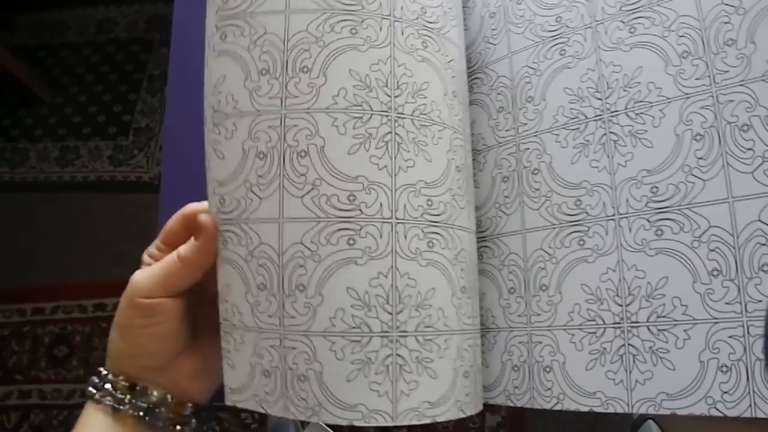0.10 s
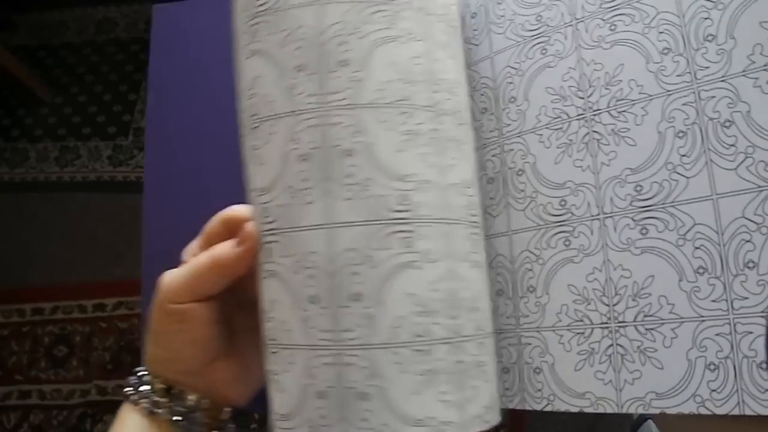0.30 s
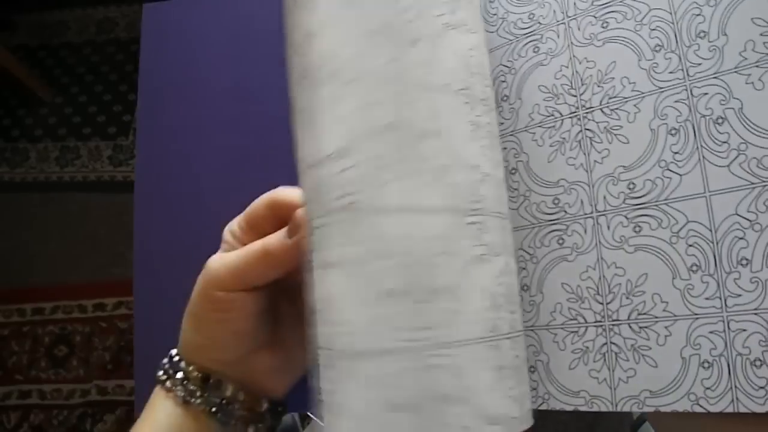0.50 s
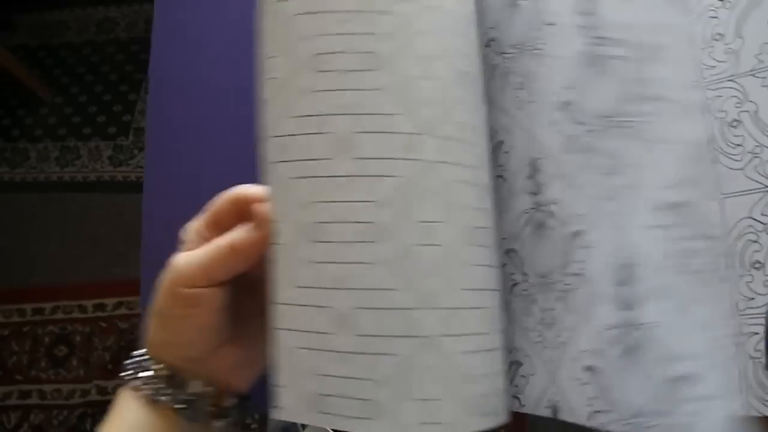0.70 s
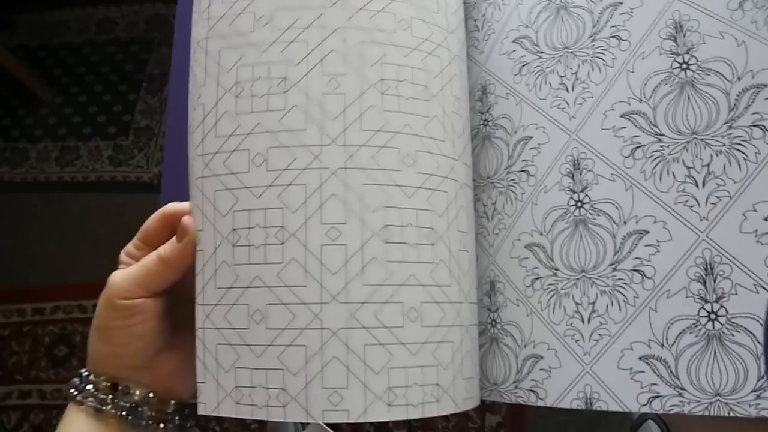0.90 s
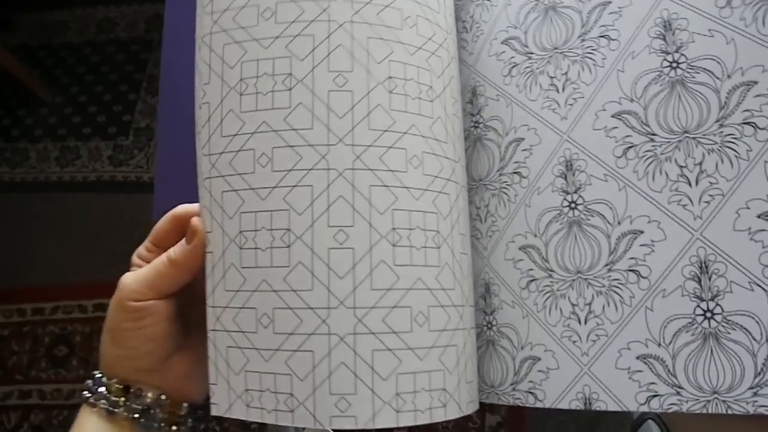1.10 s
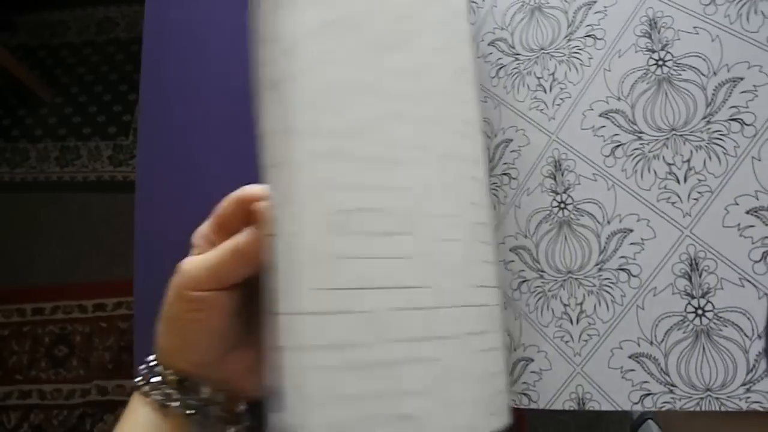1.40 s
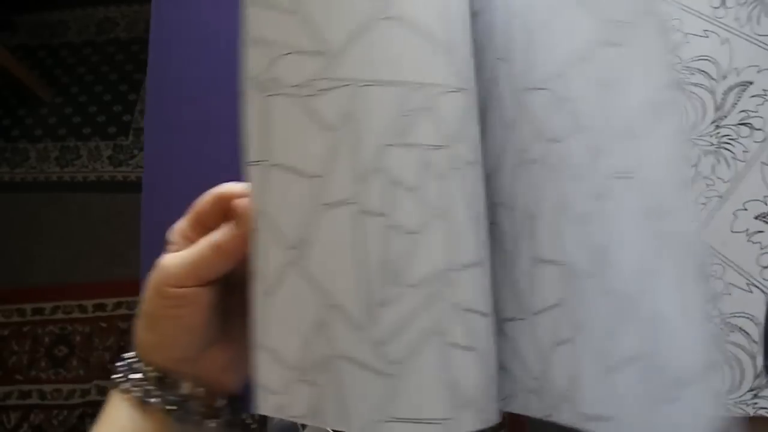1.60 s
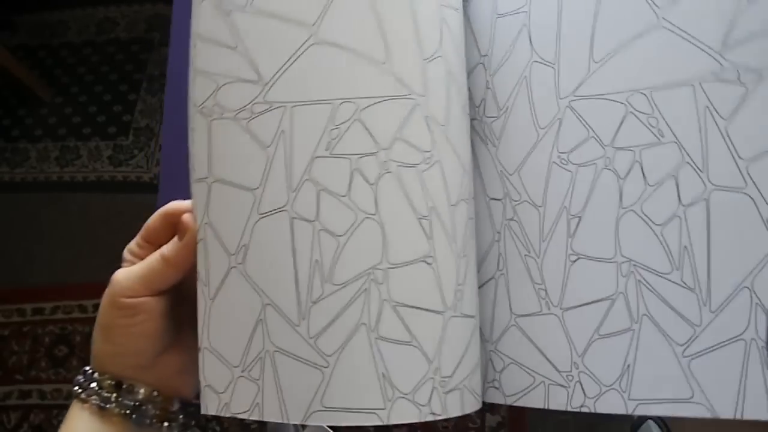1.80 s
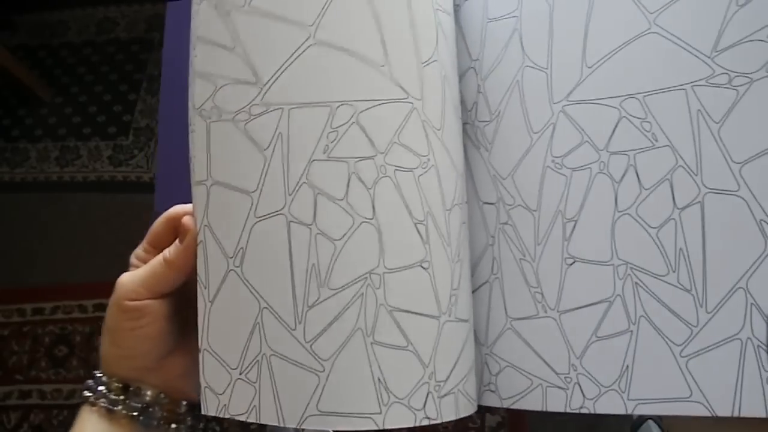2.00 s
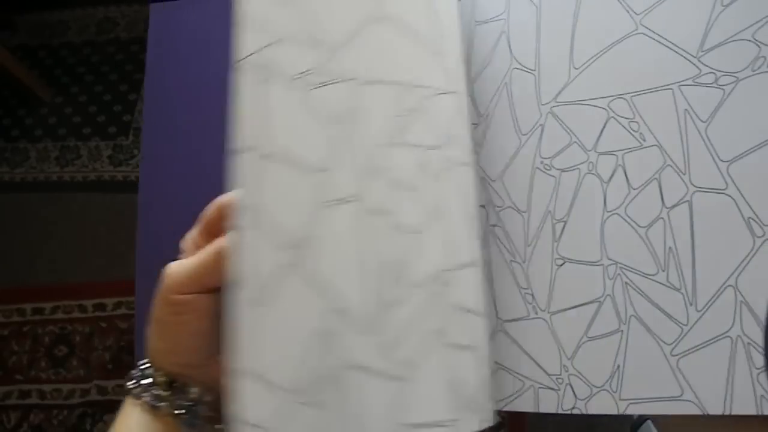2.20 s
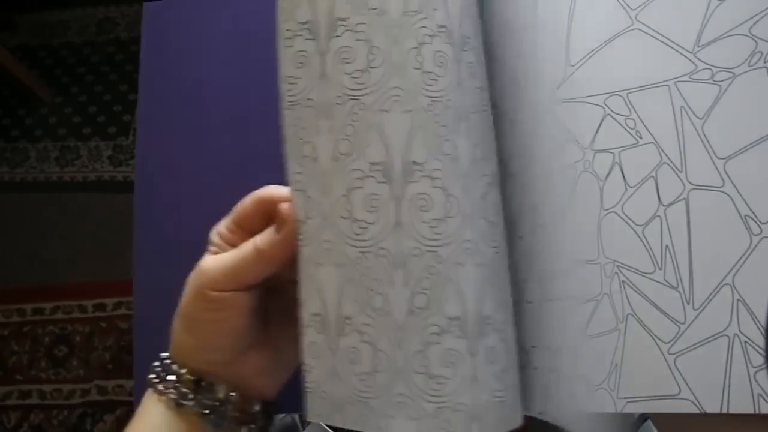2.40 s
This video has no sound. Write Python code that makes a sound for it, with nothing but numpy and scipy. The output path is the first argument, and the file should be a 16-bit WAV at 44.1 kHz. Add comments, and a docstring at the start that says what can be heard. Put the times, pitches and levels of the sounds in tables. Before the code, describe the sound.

Stiff paper sheets slide, tick against a finger and buckle with sharp snaps in three separate turns, the first strongest. Close stereo microphone, small quiet indoor space, short reflections, steady hiss and thin high whine beneath.

```python
"""Three thick pages turned by hand

Close to the microphone in a quiet room, sheets slide and buckle in runs of snaps.
A snap crosses the sheet as a bending wave, treble first, and rings its resonances briefly.
Shaped noise makes the sliding, edge ticks, crackle and puffs of air; echoes follow the snaps.
Under it lie room hiss, thin sine whistles and a faint, pulsing electrical whine."""
import sys
import numpy as np
from scipy import signal
from scipy.fft import rfft, irfft
from scipy.io import wavfile
from scipy.ndimage import uniform_filter1d

SR = 44100
rng = np.random.default_rng(int(sys.argv[2]) if len(sys.argv) > 2 else 0)


def digitize_waveform(pressure):
    """Quantize a signal to 16-bit integers and store it at the path in sys.argv[1].

    Rows of a 2-D input are taken as channels; values are limited to [-1, 1].
    """
    field = np.atleast_2d(pressure).T
    bounded = np.clip(field, -1, 1)
    quanta = np.round(bounded * 32767).astype(np.int16)
    wavfile.write(sys.argv[1], SR, quanta)


N = 114660
T = np.arange(N) / SR   # seconds
HZ = np.maximum(np.fft.rfftfreq(N, 1 / SR), 1)

# The sheet buckles. Each row: start in seconds, then drive in dB at the thump, clap and crack pitches.
SNAPS = [(0.2054, -55, -53, -35.5), (.2100, -22.5, -62, -55), (.2158, -21, -23, -43),
         (.2200, -15.5, -27, -49), (0.2316, -8.5, -4, -26), (.2390, -22.5, -25, -35),
         (.2560, -10, -6.5, -31.5), (0.2691, -18.5, -19.5, -29.5), (0.3152, -22, -30, -49),
         (0.3711, -28, -49, -53), (0.4097, -25.5, -34, -45.5), (1.4528, -29.5, -57, -71),
         (1.4671, -19, -23.5, -86), (1.4712, -28, -65, -33.5), (1.5069, -23.5, -34, -45.5),
         (1.5400, -24, -32, -57), (1.5994, -30, -54.5, -63), (2.1800, -26, -68, -47),
         (2.1940, -14.5, -13, -40), (2.2065, -25.5, -45, -60), (2.2239, -36, -55, -72),
         (2.2329, -15.5, -16.5, -30), (2.2667, -28, -40, -59)]
CLAP_HZ, CRACK_HZ = 1998, 4390
# Stereo width of the hiss and sliding paper. Each row: frequency in Hz, side minus mid in dB.
HISS_WIDTH = [(60, -10), (300, -16.5), (1300, -11), (2400, -11.5), (4400, -5.5), (8000, -4), (15000, 1.5)]
# Stereo width of the echoes, crackle and puffs. Each row: frequency in Hz, side minus mid in dB.
ECHO_WIDTH = [(60, 27), (250, -29), (700, -19), (1400, -7), (2500, -6.5), (5000, 0), (12000, 9)]
SLIDE_GRAIN_DB = 6   # rms unevenness of sliding paper


def amp(db):
    """Decibels to gain."""
    return 10 ** (np.asarray(db) / 20)


def unit(x):
    """Scale to rms 1."""
    return x / np.sqrt(np.mean(x ** 2) + 1e-20)


def colour(points, f=HZ):
    """Gain at every frequency, drawn through (Hz, dB) points on a log frequency axis."""
    hz, db = np.transpose(points)
    return amp(np.interp(np.log(f), np.log(hz), db))


def tilted(points, db_per_octave):
    """A colour tilted about 1 kHz."""
    return colour(points) * amp(db_per_octave * np.log2(HZ / 1000))


def resonance(hz, width, f=HZ):
    """Complex response of one resonance, 1 on top."""
    return 1 / (1 + 1j * (f ** 2 - hz ** 2) / (f * width))


def noise(gain, side_points):
    """Stereo noise of rms 1 with a given spectrum, built from independent mid and side."""
    mid, side = rfft(rng.standard_normal((2, N)))
    width = colour(side_points)
    left_right = mid + side * width * np.array([[1], [-1]])
    return unit(irfft(gain * left_right / np.sqrt(1 + width ** 2), N))


def tone(hz):
    """A sine of rms 1, a quarter cycle apart in the two channels."""
    return np.sqrt(2) * np.sin(2 * np.pi * (hz * T + rng.random()) + np.array([[0], [np.pi / 2]]))


def swell(middle, half):
    """A smooth bell-shaped rise and fall."""
    return np.exp(-.5 * ((T - middle) / half) ** 2)


def decay(start, t60):
    """A sudden start that dies away by 60 dB in t60 seconds."""
    return (T >= start) * np.exp(-np.log(1000) * np.maximum(T - start, 0) / t60)


def flutter(db, size):
    """A gain of rms 1 that wavers over about `size` samples."""
    return unit(amp(db * unit(uniform_filter1d(rng.standard_normal(N), size=size))))


def hiss():
    """Steady background hiss: stereo noise with an uneven spectrum."""
    # Spectrum of the hiss. Each row: frequency in Hz, relative density in dB.
    spectrum = [(25, -16), (70, -17.5), (180, -13), (320, -6.5), (800, -6.5), (1400, -8), (1850, -7.5),
                (2200, 0), (2600, -10.5), (3000, -12.5), (3300, -8), (3700, -12.5), (4500, -10),
                (5200, -17), (8500, -16.5), (9000, -10), (10000, -6), (11000, -15.5), (11900, -7.5),
                (12400, -21.5), (13300, -8.5), (14000, -16)]
    return amp(-53) * noise(colour(spectrum), HISS_WIDTH)


def whine():
    """A rough electrical whine that pulses evenly and glides up in every pulse."""
    # Levels of the first three harmonics, in dB.
    harmonics_db = [-62.5, -64, -72]
    pulse_hz, pulse_at_s, sharpness = 30.02, .0075, 1.0
    middle_hz, sweep_hz, jitter_hz = 4515, 300, 100   # the jitter is rms
    cycle = (pulse_hz * (T - pulse_at_s) + .5) % 1 - .5   # 0 where a pulse is loudest
    pulse = unit(np.exp(sharpness * np.cos(2 * np.pi * cycle)))
    jitter = unit(uniform_filter1d(rng.standard_normal(N), size=30))
    pitch = middle_hz + sweep_hz * cycle + jitter_hz * jitter
    phase = 2 * np.pi * np.cumsum(pitch) / SR
    phase = phase + np.array([[0], [np.pi / 4]])   # the channels differ in phase
    harmonics = sum(amp(db) * np.sin(k * phase) for k, db in enumerate(harmonics_db, 1))
    return pulse * np.sqrt(2) * harmonics


def whistles():
    """Thin electrical whistles, all sines; some come and go with a band of noise, the fizz."""
    # Steady whistles. Each row: pitch in Hz, level in dB.
    steady_tones = [(9778, -61.5), (11714, -62)]
    # Whistles that come and go. Each row: pitch in Hz, level in dB while on.
    passing_tones = [(10011, -66), (10537, -66), (11064, -65)]
    # When they sound. Each row: from and to in seconds.
    spans = [(0, .11), (.87, .99), (1.87, 2.13)]
    # The fizz, one row: middle in Hz, resonance width in Hz, level in dB while on.
    hz, width, db = (10600, 1300, -63)
    fizz = amp(db) * noise(resonance(hz, width) ** 2, HISS_WIDTH)
    gate = sum(1.0 * ((T >= a) & (T < b)) for a, b in spans)
    gate = uniform_filter1d(gate, size=300)   # softens the switching
    passing = sum(amp(db) * tone(hz) * flutter(2, size=300) for hz, db in passing_tones)
    steady = sum(amp(db) * tone(hz) for hz, db in steady_tones)
    return steady + gate * (passing + fizz)


def echoes(x):
    """A quick cluster of reflections from the book and table, and a faint room tail, as decaying noise."""
    # Colour of the reflected sound. Each row: frequency in Hz, gain in dB.
    reflected = [(100, -13), (450, 7), (2000, -2.5), (5000, -10.5)]
    near_db, near_delay_s, near_t60_s = -9, .004, .055
    room_db, room_delay_s, room_t60_s = -23.5, .008, .27
    near = amp(near_db) * unit(decay(near_delay_s, near_t60_s)) * noise(1, ECHO_WIDTH)
    room = amp(room_db) * unit(decay(room_delay_s, room_t60_s)) * noise(1, ECHO_WIDTH)
    response = (near + room) / np.sqrt(N)
    coloured = irfft(rfft(x) * colour(reflected), N)
    return signal.fftconvolve(coloured[None], response, axes=1)[:, :N]


def puffs():
    """Air pushed by the page: low-pitched noise that swells and fades."""
    # Each row: middle in seconds, half length in seconds, level in dB.
    gusts = [(0.265, 0.037, -59), (1.434, 0.01, -72), (2.178, 0.015, -80)]
    # Colour of the air noise. Each row: frequency in Hz, relative level in dB.
    air = [(20, -23), (45, 0), (90, -11), (190, 9), (350, -10), (1000, -61.5)]
    return sum(amp(db) * swell(s, half) for s, half, db in gusts) * noise(colour(air), ECHO_WIDTH)


def swish():
    """The turned sheet glides over its neighbour: a soft, narrow, uneven hush of noise."""
    # One row: middle in seconds, half length in seconds, pitch in Hz, resonance width in Hz, level in dB.
    s, half, hz, width, db = (.675, .03, 2550, 700, -58)
    grain = flutter(SLIDE_GRAIN_DB, size=300)
    return amp(db) * swell(s, half) * grain * noise(resonance(hz, width) ** 2, HISS_WIDTH)


def slides():
    """Sheet slides on sheet: swells of noise with a fine, uneven grain."""
    # Each row: middle in seconds, half length in seconds, level in dB, tilt in dB per octave.
    strokes = [(0.214, .012, -40.5, -0.5), (.410, 0.025, -56, 1), (1.277, 0.022, -53.5, 0.5),
               (1.453, 0.011, -45, -3), (2.01, 0.036, -56.5, 2.5), (2.174, 0.0042, -44.5, -3.5),
               (2.196, 0.016, -44.5, -1)]
    # Colour before the tilt. Each row: frequency in Hz, relative level in dB.
    rub = [(150, -24), (500, 12), (1300, 4.5), (2500, 5), (4200, -1.5), (7000, -10), (15000, -18)]
    grain = flutter(SLIDE_GRAIN_DB, size=90)
    return sum(amp(db) * swell(s, half) * grain * noise(tilted(rub, tilt), HISS_WIDTH)
               for s, half, db, tilt in strokes)


def ticks():
    """The paper's edge catches on the finger: noise that starts at once and dies away."""
    # Each row: start in seconds, level in dB, tilt in dB per octave.
    catches = [(.3915, -40, 3), (0.422, -47, 3), (1.239, -47, 0), (1.2489, -39.5, 1.5), (1.989, -45, -1),
               (2.010, -44, -2)]
    # Colour before the tilt. Each row: frequency in Hz, relative level in dB.
    edge = [(80, -25), (300, -10), (700, -2), (4000, -3), (7500, -7), (11500, -1), (15000, -14)]
    t60_s = .029
    return sum(amp(db) * decay(s, t60_s) * noise(tilted(edge, tilt), HISS_WIDTH)
               for s, db, tilt in catches)


def crackle():
    """Fibres give way for a moment after each snap: noise that decays from the snap's crack level."""
    # Colour of the creasing fibres. Each row: frequency in Hz, relative level in dB.
    fibres = [(500, -8.5), (1500, 5.5), (2900, 2), (4300, 4.5), (5000, -5), (6200, -6), (7000, -21),
              (10500, -3.5), (15000, -38)]
    t60_s = .026
    power = sum((amp(crack_db) * decay(s, t60_s)) ** 2 for s, _, _, crack_db in SNAPS)
    return np.sqrt(power) * noise(colour(fibres), ECHO_WIDTH)


def bending_wave(f, size):
    """Travel across the sheet: low notes are slower and arrive last; both extremes radiate weakly."""
    travel_s, slowest_hz = .00241, 278.6   # travel time at 1 kHz; below this pitch it slows no further
    low_hz, top_hz = 260, 5230             # the sheet radiates little outside these
    travel = travel_s / np.sqrt(np.maximum(f, slowest_hz) / 1000)
    lag = np.maximum(travel - np.interp(CRACK_HZ, f, travel), 0)
    delay = np.exp(-2j * np.pi * np.cumsum(lag) * SR / size)   # phase is the running sum of the lag
    return delay / np.sqrt((1 + (low_hz / f) ** 6) * (1 + (f / top_hz) ** 8))


def snaps(size=4096):
    """Each snap sends a bending wave through the sheet's resonances, a little different every time."""
    # Resonances of the sheet. Each row: average pitch in Hz, width in Hz, average level in dB.
    modes = [(192, 89, -7), (269, 13, -12.5), (505, 83, 2), (710, 163, 1), (787, 122, 0.5), (1110, 67, -6),
             (1651, 244, -4), (1920, 124, -2.5), (2943, 360, -4.5), (3890, 900, -2.5)]
    thump_hz = 830
    shape_spread, strike_spread_db = .02, 1.2   # the curl of the sheet shifts pitches (fraction) and levels
    f = np.maximum(np.fft.rfftfreq(size, 1 / SR), 1)
    wave = bending_wave(f, size)
    out, lead = np.zeros(N + size), size // 16   # the lead leaves room for sound ahead of the start
    for s, thump_db, clap_db, crack_db in SNAPS:
        ring = 0
        for hz, width, db in modes:
            level, shift = rng.standard_normal(2)
            mode = resonance(hz * (1 + shape_spread * shift), width, f)
            ring = ring + amp(db + strike_spread_db * level) * mode
        sheet = wave * ring
        body = irfft(sheet * (f < CLAP_HZ))
        sheet = sheet / np.abs(signal.hilbert(body)).max()   # equal peak below the clap pitch
        blow = colour([(thump_hz, thump_db), (CLAP_HZ, clap_db), (CRACK_HZ, crack_db)], f)
        start = int(s * SR) - lead
        out[start:start + size] += np.roll(irfft(sheet * blow), lead)
    return out[:N]


def scene():
    """The pages in the room, over hiss, whine and whistles."""
    background = hiss() + whine() + whistles()
    page = snaps()
    paper = puffs() + swish() + slides() + ticks() + crackle()
    return background + echoes(page) + paper + page


def record(dry):
    """A steep low-pass cuts the top above 15.8 kHz."""
    steep = signal.ellip(12, .1, 70, 15800, fs=SR, output="sos")   # 0.1 dB ripple, 70 dB stopband
    return signal.sosfilt(steep, dry)


dry = scene()
out = record(dry)
digitize_waveform(out)
```